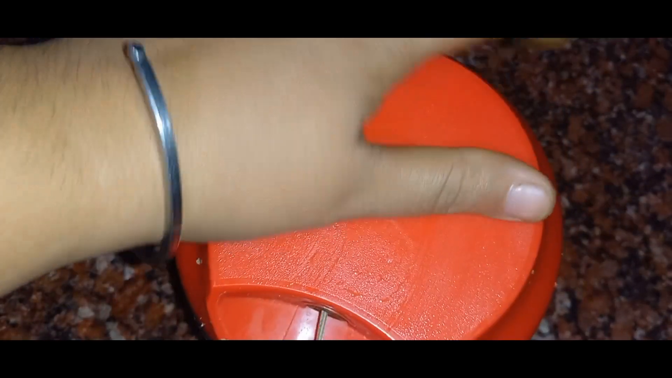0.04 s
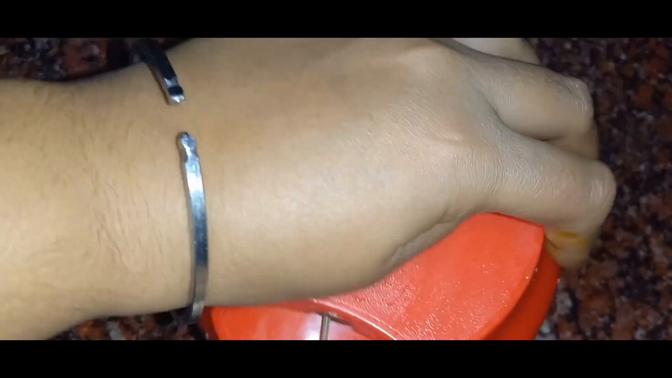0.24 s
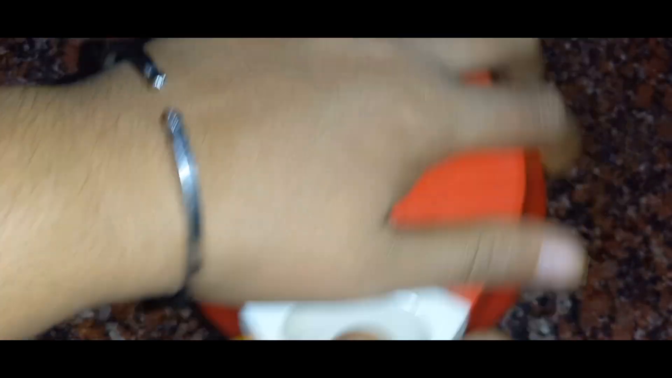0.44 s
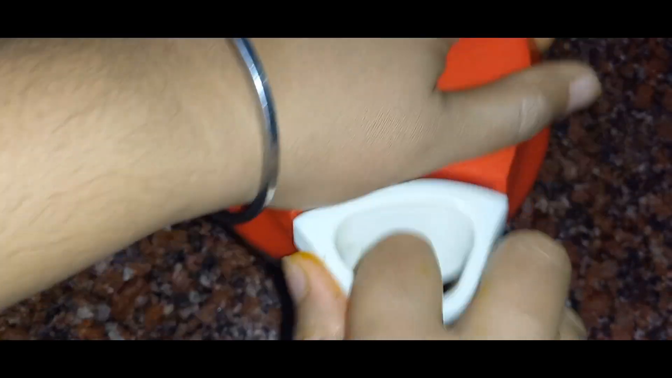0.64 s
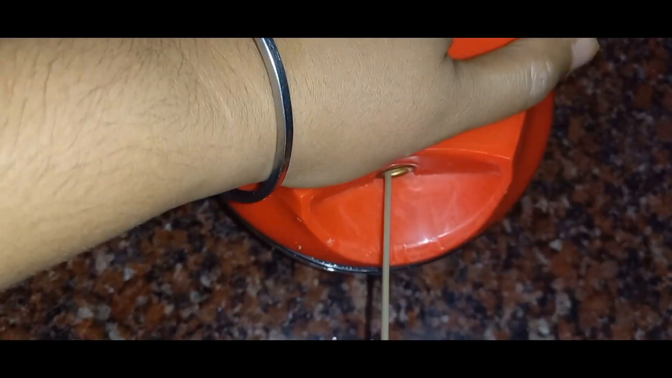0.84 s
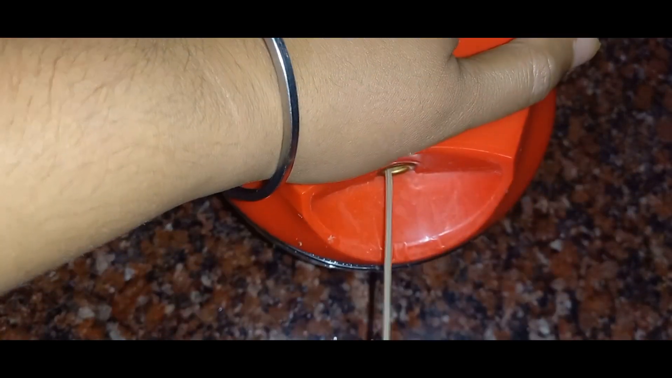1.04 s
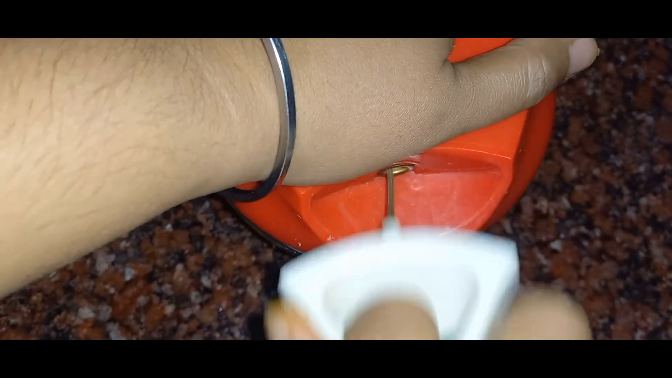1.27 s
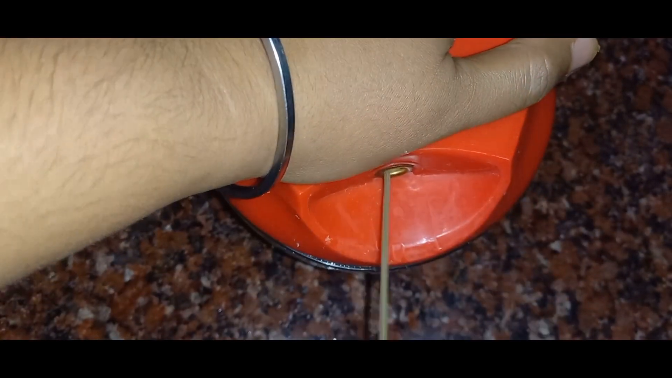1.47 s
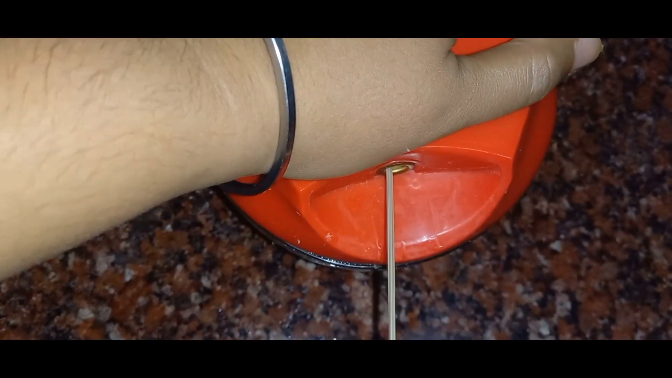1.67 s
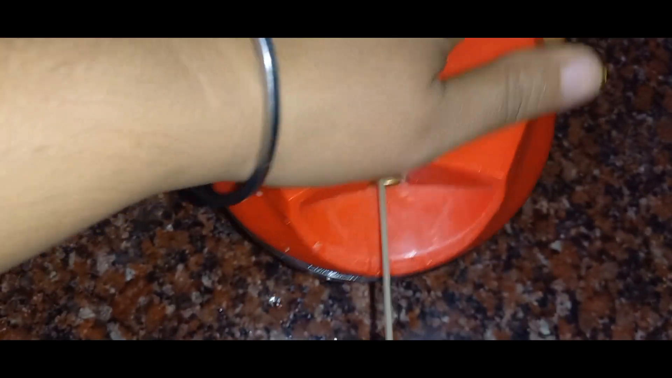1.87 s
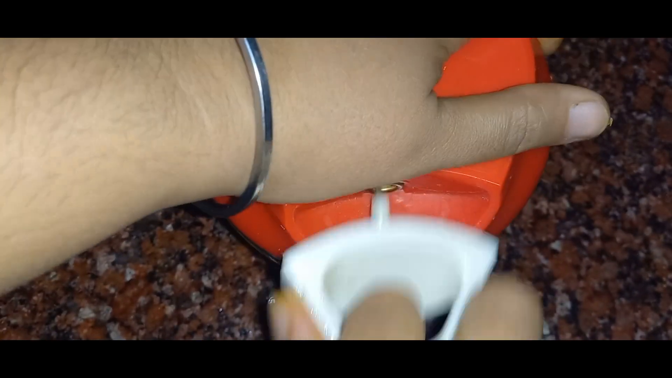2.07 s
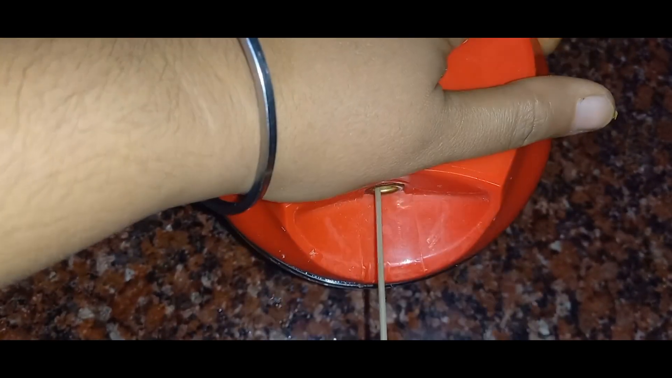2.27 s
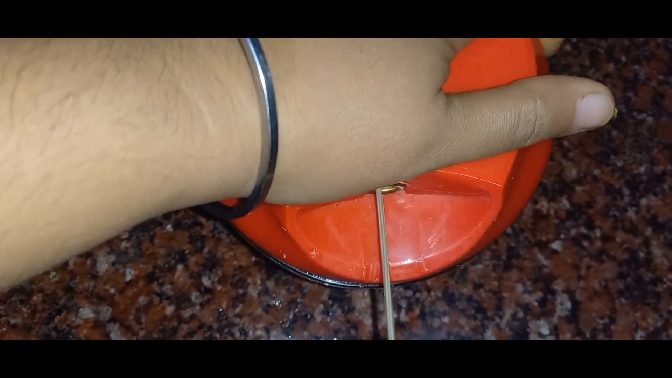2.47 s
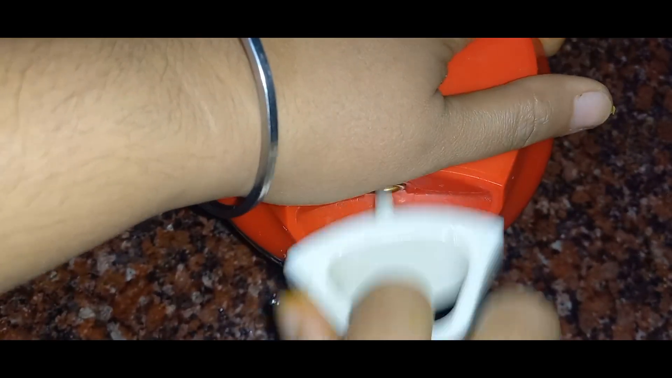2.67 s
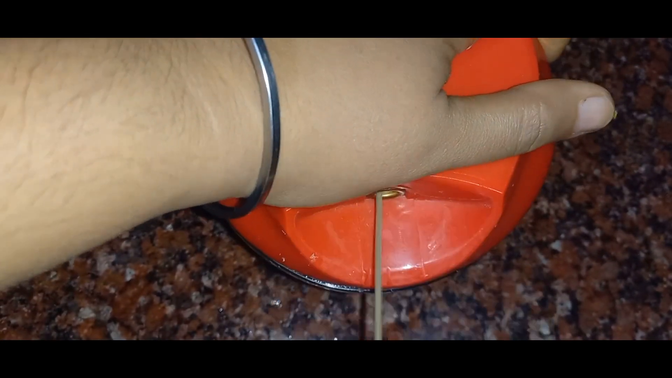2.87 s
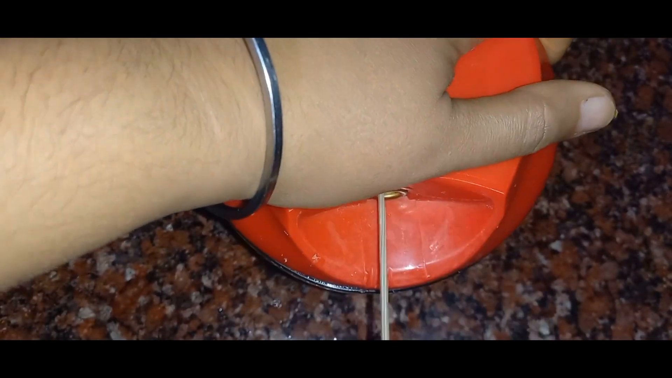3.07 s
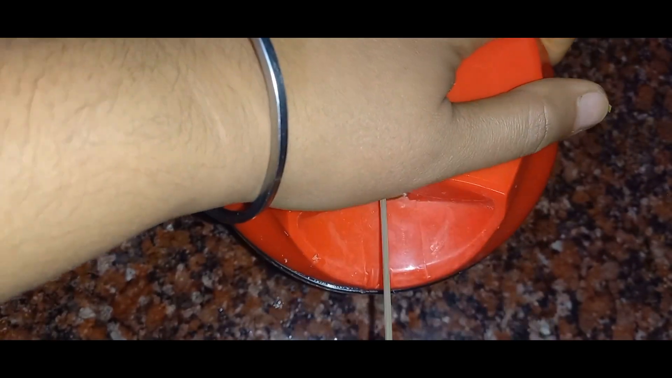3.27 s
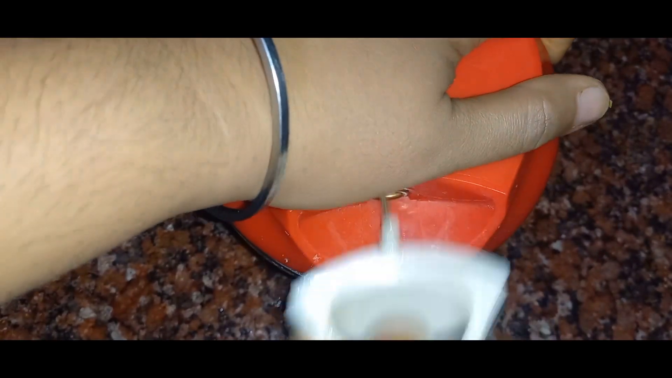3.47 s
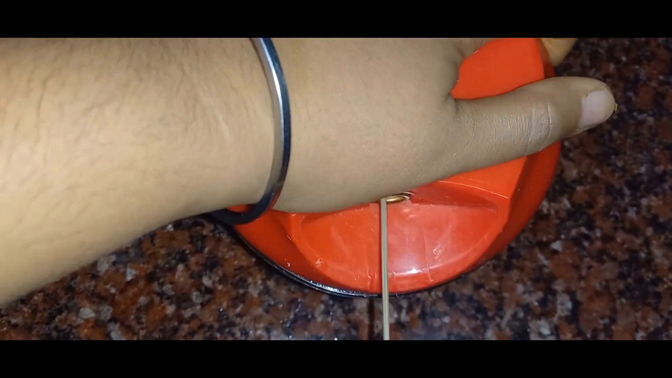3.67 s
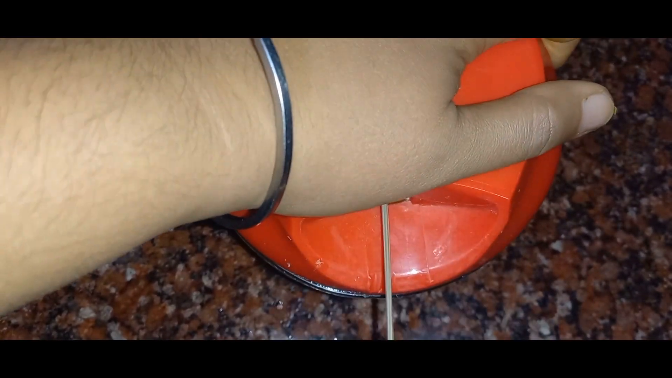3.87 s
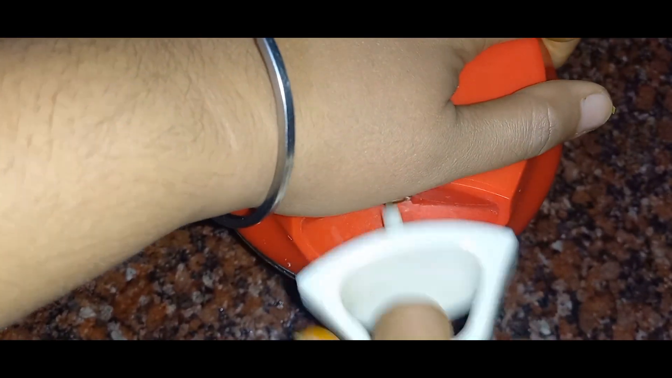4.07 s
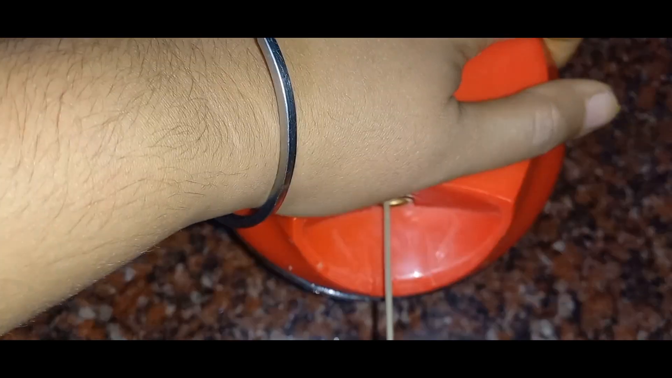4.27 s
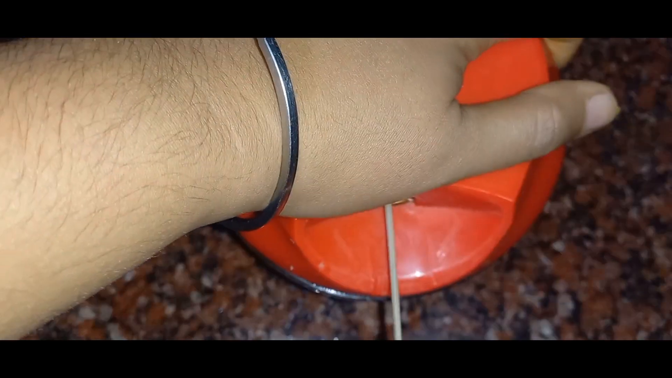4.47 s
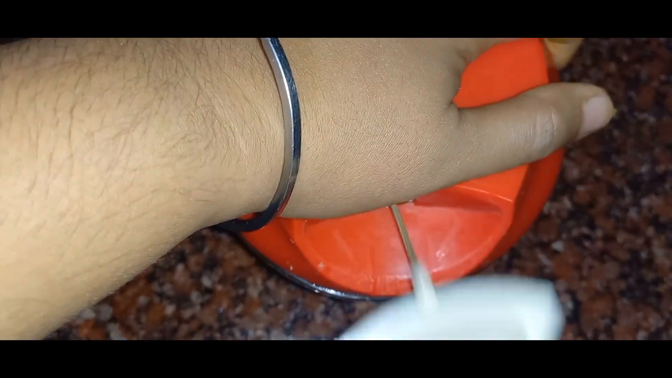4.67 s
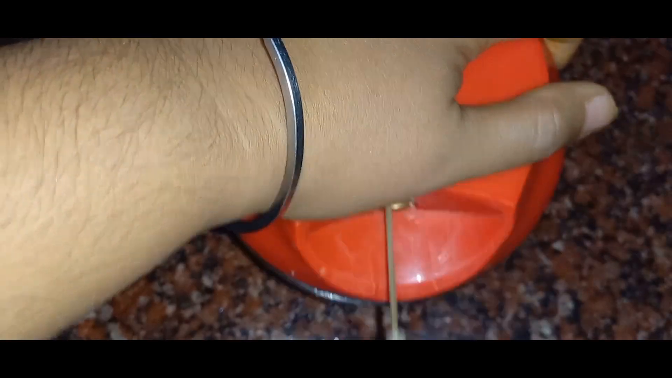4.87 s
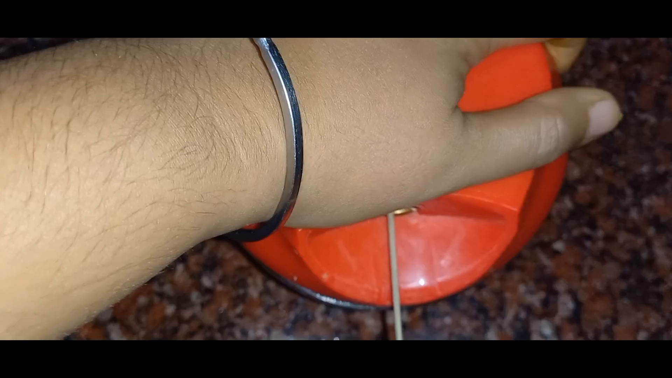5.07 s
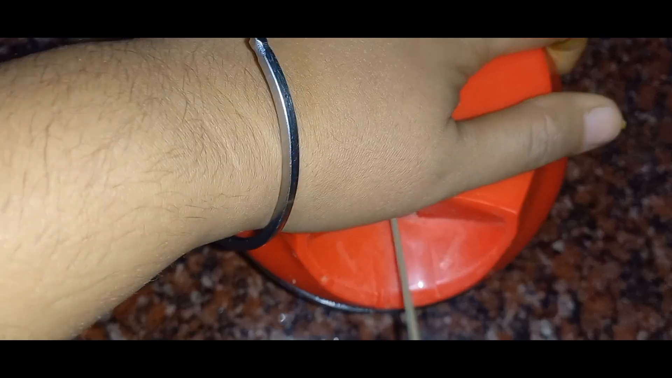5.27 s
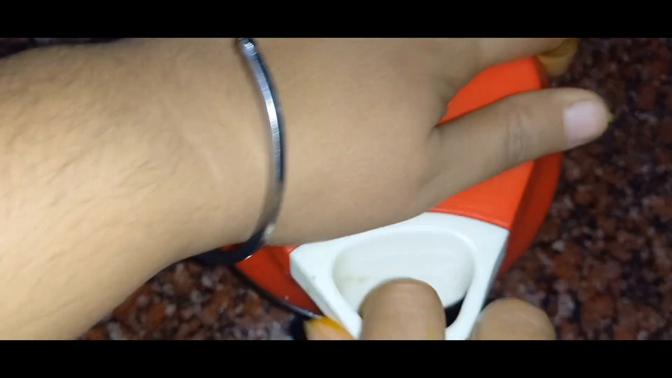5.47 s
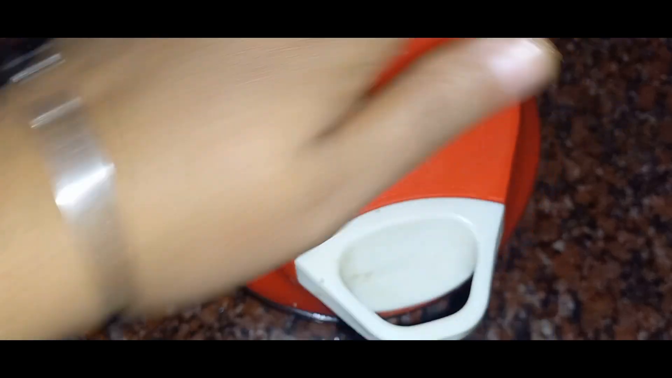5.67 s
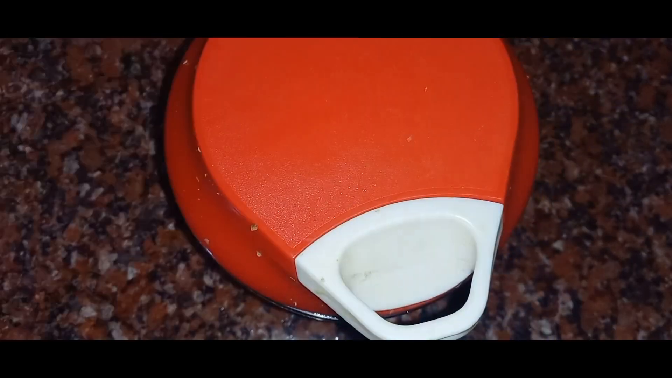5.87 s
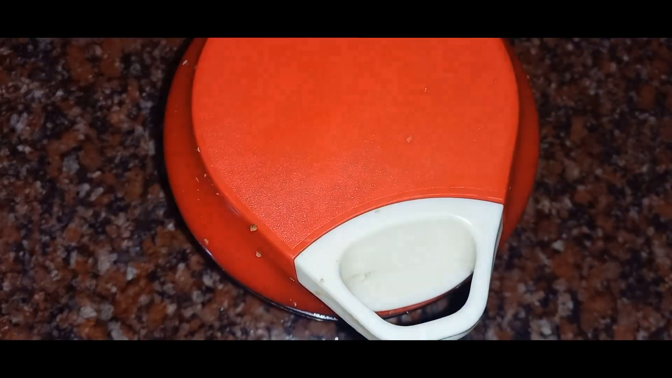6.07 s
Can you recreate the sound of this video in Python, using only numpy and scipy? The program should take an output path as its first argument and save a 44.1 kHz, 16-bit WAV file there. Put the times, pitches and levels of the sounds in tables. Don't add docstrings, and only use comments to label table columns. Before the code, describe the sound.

A hand-pull food chopper is worked in seven quick pulls, blades crunching vegetables in a plastic bowl, the cord rasping back with hard plastic clacks.

```python
import sys
import numpy as np
from scipy import signal
from scipy.fft import rfft, irfft, next_fast_len
from scipy.io import wavfile
from scipy.ndimage import uniform_filter1d

SR = 44100
rng = np.random.default_rng(int(sys.argv[2]) if len(sys.argv) > 2 else 0)


def natural_amplitude(level_db):
    exponent = np.asarray(level_db, float) / 20
    return 10 ** exponent


def file_out(sig):
    cols = np.atleast_2d(sig).T
    lim = np.clip(cols, -1, 1)
    pcm = np.round(lim * 32767).astype(np.int16)
    wavfile.write(sys.argv[1], SR, pcm)


N = 270814
TAPS = 8192
TIME = np.arange(N) / SR
HZ = np.arange(1, TAPS + 2) * SR / (2 * TAPS + 2)

# centre_hz, width_hz, height_db
BOWL_PEAKS = [(198.4, 6.9, 6.5), (227, 16, 11), (351.4, 53, 8), (451.4, 35, 7), (632, 67, 9.5),
              (1410, 170, 6), (1620, 27, 12), (1880, 420, 11), (3450, 170, 10.5), (4070, 460, 3),
              (6820, 2200, -6.5)]
# centre_hz, width_hz, height_db
SPRING_PEAKS = [(350, 45, 5.5), (662, 56, 9), (1920, 380, 15), (3300, 400, 3.5), (6400, 2430, -7.5),
                (13000, 5700, 1.5), (11360, 710, 2.5)]
# frequency_hz, level_db
BOWL_COLOUR = [(24, -58.5), (40, -30.5), (276, 5), (337, 3.5), (491, -3), (1900, -20), (2700, -16),
               (3470, -18.5), (7170, -25.5), (14800, -34.5), (16000, -44)]


def blades():
    # start_s, swell_s, hold_s, fall_s, effort_db
    pulls = [
        (0.796, 0.076, 0.17, 0.16, -26.5),
        (1.518, 0.061, 0.16, 0.11, -27),
        (2.212, 0.071, 0.17, 0.11, -26),
        (2.893, 0.11, 0.12, 0.11, -23.5),
        (3.584, 0.11, 0.12, 0.1, -23),
        (4.253, 0.11, 0.095, 0.15, -24),
        (4.914, 0.099, 0.1, 0.13, -26.5),
    ]
    # offset_db, slope_db_per_db
    pull_layers = [(-1, 0.7), (-1, 0.9), (-12, 1)]
    # pitch_hz, t60_s, level_db
    slab_modes = [(68.9, 1, -2.5), (106, 0.03, 1)]
    slab_db = [-19, -16.5, -26.5, -24.5, -20, -23, -22.5]
    cuts = grit(rate=200., scatter_db=4., tail_ms=1.1, bed_db=-14., flicker_db=1.2, flicker_rate=35., own=.35)
    crunch = wander(cuts + teeth(), BOWL_PEAKS)
    rumble = rng.standard_normal((2, N))
    slab = sum(natural_amplitude(db) * ring(hz, t60) for hz, t60, db in slab_modes)
    tables = arc(pulls, pull_layers, start_db=-11.5, end_db=-27, swell_db_per_s=-51.5)
    tables = add_layer(tables, 2, slab_db)
    tables = coast(tables, coast_s=0.058, change_db=10.5)
    return strokes(tables, [crunch] * 3 + [rumble], body(BOWL_COLOUR, BOWL_PEAKS) + [slab])


def teeth():
    rate, jitter = 110., .35
    level_db, scatter_db = 15., 5.
    timing, size, place = rng.standard_normal((int(N / SR * rate), 3)).T
    at = (np.arange(len(timing)) + jitter * timing) * SR / rate
    at = at.astype(int).clip(0, N - 1)
    out = np.zeros((2, N))
    out[:, at] = natural_amplitude(level_db + scatter_db * size) * np.array([np.ones(len(at)), place])
    return out


def spring():
    # start_s, swell_s, hold_s, fall_s, effort_db
    rewinds = [
        (1.168, 0.024, 0.11, 0.12, -34),
        (1.855, 0.06, 0.071, 0.16, -31.5),
        (2.548, 0.04, 0.044, 0.24, -32),
        (3.236, 0.052, 0.075, 0.15, -32.5),
        (3.917, 0.061, 0.064, 0.19, -31.5),
        (4.577, 0.046, 0.11, 0.12, -32),
        (5.246, 0.033, 0.085, 0.24, -38.5),
    ]
    # offset_db, slope_db_per_db
    rewind_layers = [(5.4, 1.49), (3.6, 1.1), (2.54, 1.51)]
    coil_db = [-3, -2.5, -5, -1, -2, -6, 0]
    # frequency_hz, level_db
    rasp_colour = [(24, -56), (40, -15.5), (85, -9.5), (320, -5.5), (382, -5.5), (663, -16), (1150, -23.5),
                   (1900, -23.5), (5720, -19), (11300, -25.5), (16000, -33)]
    slips = grit(rate=300., scatter_db=3., tail_ms=2.5, bed_db=-8., flicker_db=1.6, flicker_rate=45., own=.7)
    rasp = wander(slips, SPRING_PEAKS)
    seated_s = 5.58
    song = slips * natural_amplitude(4. * walk(rate=70.) - 2) * (TIME < seated_s)
    coil = ring(8370, t60=.0055)
    tables = arc(rewinds, rewind_layers, start_db=-0.89, end_db=-17, swell_db_per_s=-120)
    tables = add_layer(tables, 3, coil_db)
    tables = coast(tables, coast_s=0.13, change_db=-10)
    return strokes(tables, [rasp] * 3 + [song], body(rasp_colour, SPRING_PEAKS) + [coil])


def knocks():
    # start_s, crack_peak_db, boom_db and tick_db against the crack, pitch_hz
    lid = [(0.186, -53, -4, -7, 2250), (0.228, -47, -21, -8, 1920), (0.293, -49.5, -8.5, 3.5, 1590),
           (0.352, -21, -1, -18.5, 1920), (0.372, -21.5, -26, -6.5, 1770),
           (0.392, -20.5, -5.5, -15.5, 1960), (0.404, -23.5, -2, -3, 2000), (0.439, -30, 1.5, -5.5, 1590),
           (0.456, -30, -20, -13, 1630), (0.47, -22, -14, -30, 1560), (5.735, -33.5, 9, -18, 1910)]
    handle = [(1.434, -52, 18, -29, 1250), (1.474, -33.5, 1, -2.5, 3580), (1.484, -23, 1, -13, 1920),
              (2.123, -20.5, 2, -38, 1370), (2.781, -18, -4.5, -34.5, 1590), (2.792, -26, -9, 1.5, 2670),
              (3.517, -20.5, -7, -22, 1620), (4.195, -21, -10, -26, 1540), (4.826, -11.5, -16, -24, 2240),
              (4.836, -6, -16, -19, 2720), (5.5367, -20.5, -13, -6.5, 2800), (5.544, -15, -10, -18, 1260)]
    clutch = [(0.761, -24, -28, -5.5, 1800), (0.778, -21, -1, -11.5, 1460), (1.191, -23, -4, -3, 1460),
              (1.238, -26.5, 0, 7, 1850), (1.509, -18.5, -10, -9, 1860), (1.539, -17.5, -9, -16, 2920),
              (1.863, -29.5, -1, -6, 1930), (1.924, -16, -11, -21, 1920), (1.957, -19, -27, -11.5, 1900),
              (2.18, -24, -9, -8, 1890), (2.195, -25.5, 3.5, -30.5, 1920), (2.588, -13.5, -16, -13.5, 1410),
              (2.875, -15.5, -7.5, -16.5, 1620), (2.885, -24, -5.5, -14.5, 1980),
              (2.924, -22.5, -6, -9.5, 1790), (3.3, -14.5, -9.5, -16.5, 1630), (3.563, -26, -4, -6, 1730),
              (4.238, -23, -7.5, -5.5, 1730), (4.257, -26, 2.5, -3.5, 1810), (4.64, -13, -5, -11, 1560),
              (4.901, -27, -7, -3, 1640), (4.916, -17, -5, -16, 1620), (5.244, -20.5, -7.5, -7.5, 1410)]
    cuts = [(0.885, -16.5, -9.5, -16.5, 1670), (1.028, -12.5, -2.5, -28, 1550),
            (1.058, -14.5, -12, -25.5, 1680), (1.096, -17, -12, -13, 1900), (1.707, -18, -22, -19, 1850),
            (2.271, -15, -4.5, -31.5, 1300), (2.284, -10, -14, -17.5, 3300), (2.304, -13, -18, -27.5, 3340),
            (2.436, -27, -2.5, 8, 1480), (2.462, -18.5, -1.5, -13, 2350), (2.996, -19, -9, -10.5, 1620),
            (3.106, -16.5, -21, -8.5, 1600), (3.664, -17.5, -7.5, -20.5, 1990), (3.732, -9, -13, -25, 1850),
            (3.855, -15.5, -16, -24, 4000), (4.333, -22, 0, -11.5, 3520), (4.362, -15, -30.5, -8.5, 4270),
            (4.424, -19, -3, -11, 1640), (5.042, -28.5, 14, -13.5, 1360), (5.062, -15.5, -19, -6.5, 2340),
            (5.104, -15.5, -21, -20, 1600), (5.146, -19.5, 4, -16, 3800)]
    strays = [(0.264, -58, -18, 7, 2080), (0.49, -46, 7, -28, 1550), (1.59, -20.5, -19, -9, 1540),
              (1.645, -27, 2, -10.5, 1910), (2.505, -25, -33, -9, 3530), (2.632, -19, -13, 0.5, 1840),
              (3.063, -20, 3.5, -27, 1880), (3.138, -13.5, -13, -17, 3450), (3.151, -16, -2, -19.5, 3420),
              (3.342, -23.5, -0.5, 2, 2750), (3.491, -43, -1, 4, 1895), (3.801, -13.5, -14, -23, 3700),
              (4.248, -21.5, 2, -14, 1860), (4.47, -14.5, -18, -15, 1390), (4.677, -18.5, -9, -1.5, 3520),
              (5.283, -36, 1, -16, 1910), (5.359, -26.5, 1.5, -17, 3100)]
    bits = [(0.8455, -18, -8, -25, 1660), (0.9195, -21.5, -26, -14, 1510), (0.952, -15, -25, -11, 1770),
            (0.9882, -16.5, -7, -18, 1780), (1.1754, -31, -17, -20, 3610), (1.5808, -17, -24, -14, 3590),
            (1.614, -15.5, -23, -23, 1960), (1.67, -19.5, -14, -17, 1820),
            (1.7216, -17.5, -20, -16.5, 1420), (1.756, -27, -6, -21, 3430), (1.765, -19, -38, -32, 1230),
            (1.8174, -32, 2, -20, 1870), (1.9765, -22, -23, -19.5, 1880), (2.0004, -24, -21, -20.5, 2100),
            (2.2476, -21, -6, -39.5, 1440), (2.3586, -16.5, -22.5, -11.5, 1950),
            (2.3994, -42.5, -27, -27, 1930), (3.0517, -14, -11, -17, 1110), (3.0851, -15, -6, -20, 1600),
            (3.6792, -12, -20.5, -17, 3270), (3.714, -13.5, -3.5, -24.5, 1630),
            (3.75, -17.5, -16.5, -26.5, 1830), (3.762, -14.5, -17, -24, 4090),
            (3.8609, -23.5, -17, -9.5, 2170), (3.9734, -31, -22, -20, 1870),
            (3.9869, -14.5, -6, -28.5, 1770), (4.0255, -17, -19, -20, 1960), (4.291, -24.5, -18, -7, 1850),
            (4.3102, -25.5, -16, -11.5, 1610), (4.357, -15.5, -11, -15.5, 3940),
            (4.4167, -22.5, -22, -11.5, 1670), (4.4485, -15, -11, -23, 1600), (4.585, -26, -19, -22, 2190),
            (4.807, -37, -14, -19, 2104), (4.9965, -35, -24, -18, 1870), (5.0158, -24, -15, -3.5, 1670),
            (5.3066, -23.5, 0.5, -19, 1860)]
    snaps = [
        (3.867, -25, -29, -24, 4180),
        (5.5692, -17.5, -29, -20, 1940),
        (5.5756, -15, -38, -13.5, 1850),
        (5.5788, -17, -29, -22, 2420),
    ]
    clacks = [(0.876, -11, -15, -13, 1670), (1.002, -15, -16, -19.5, 1760),
              (1.9176, -13.5, -15.5, -18.5, 1910), (2.159, -18.5, -25.5, -34, 2170),
              (2.376, -14, -12, -18, 1900), (2.39, -17, -17, -22, 3400), (2.7986, -8, -16.5, -19.5, 2730),
              (2.808, -12.5, -11.5, -19, 2700), (3.5382, -14.5, -14.5, -23, 2630),
              (3.2402, -35, -9, -8, 3300), (3.645, -21, -15, -18, 3400), (3.919, -36, -18, 2, 3300),
              (4.5814, -29, -11, -3, 3300), (5.006, -19, -17, -17, 3300), (5.292, -26, -5, -7, 3130),
              (2.554, -38, -15, 0, 3300), (3.791, -17.5, -21, -23.5, 3310), (4.21, -9.5, -24, -24, 2530),
              (4.468, -16, -21, -8, 1710), (5.098, -9.5, -11, -18.5, 1620)]
    # rattle_ms, share of the spot's own ring, share of rattle in the crack
    contacts = [
        (10.8, 2.2, 0.43),
        (10.4, 0.87, 0.16),
        (11.3, 1.15, 0.42),
        (9.2, 2, 0.41),
        (7.7, 1.1, 0.7),
        (6.1, 0.76, 0.45),
        (4.5, 4.4, 0.33),
        (3.3, 1.8, 0.29),
    ]
    size = 3000
    out, t = np.zeros((2, N + size)), TIME[:size]
    boom, middle, treble = (response[:size] for response in body(BOWL_COLOUR, BOWL_PEAKS))
    boom = boom + .45 * ring(352., t60=.1, size=size)
    for table, kind in zip((lid, handle, clutch, cuts, strays, bits, snaps, clacks), contacts):
        rattle_ms, spot_share, loose = kind
        decay = np.exp(-t * 1000 / rattle_ms)
        for start_s, crack_db, boom_db, tick_db, pitch_hz in table:
            rattle = rng.standard_normal((2, size)) * decay
            spot = ring(pitch_hz, t60=.006, size=size)
            crack = np.exp(-t / .00005) + loose * rattle
            blow = np.exp(-t / 0.000055) + 0.19 * rattle
            parts = [
                (boom_db + 0.5, through(blow, boom)),
                (0, through(crack, middle + spot_share * spot)),
                (tick_db + 5.5, through(rattle * decay, treble)),
            ]
            at = int(start_s * SR)
            for db, part in parts:
                out[:, at:at + size] += natural_amplitude(crack_db + db) * part / np.abs(part[0]).max()
    return out[:, :N]


def thuds():
    # start_s, peak_db, pitch_hz
    lumps = [(0.816, -21, 273), (0.84, -23, 350), (0.876, -21, 342), (0.929, -19, 252), (0.966, -16.5, 275),
             (1.026, -28, 340), (1.159, -27, 343), (1.21, -20, 345), (1.433, -30, 332), (1.484, -28, 359),
             (1.531, -39, 345), (1.553, -17.5, 220), (1.581, -17.5, 343), (1.631, -14.5, 332),
             (1.707, -12.5, 338), (1.738, -12, 320), (1.924, -20.5, 303), (1.984, -31, 344),
             (2.018, -22.5, 330), (2.122, -31, 328), (2.195, -29, 330), (2.268, -12, 360),
             (2.271, -17.5, 321), (2.303, -10.5, 251), (2.456, -41, 358), (2.565, -24, 300),
             (2.592, -24.5, 404), (2.78, -32.5, 344), (2.803, -19.5, 328), (2.878, -27, 307),
             (2.898, -26, 246), (2.974, -31.5, 213), (3.251, -20.5, 347), (3.342, -27.5, 316),
             (3.516, -33, 325), (3.587, -30.5, 204), (3.587, -23, 344), (3.632, -24, 350),
             (3.67, -25.5, 318), (3.694, -11, 330), (3.852, -30, 317), (3.939, -32, 342), (3.975, -21, 329),
             (4.193, -30, 320), (4.25, -16, 336), (4.292, -14.5, 332), (4.42, -15, 350), (4.471, -13, 291),
             (4.511, -16, 346), (4.631, -17, 315), (4.834, -20.5, 338), (4.918, -27, 328), (5.043, -9, 300),
             (5.069, -12, 340), (5.106, -23, 282), (5.146, -28, 356), (5.281, -31, 345),
             (5.543, -26.5, 347)]
    size, push_ms, t60_s, level_db = 6000, 2.2, 0.11, -7
    out, t = np.zeros(N + size), TIME[:size]
    shape = (1 - np.exp(-t * 1000 / push_ms)) * np.exp(-np.log(1000) * t / t60_s)
    shape = shape / shape.max()
    for start_s, peak_db, pitch_hz in lumps:
        at = int(start_s * SR)
        out[at:at + size] += natural_amplitude(peak_db + level_db) * np.sin(2 * np.pi * pitch_hz * t) * shape
    return out[:N]


def hand():
    # start_s, swell_s, hold_s, fall_s, effort_db
    rubs = [
        (.05, .035, 0.024, .05, -60),
        (.215, 0.045, 0.2, .02, -56.5),
        (.478, 0.006, 0.01, 0.12, -53.5),
        (.715, 0.037, .005, .01, -58),
        (5.585, 0.005, 0.01, 0.13, -46),
        (5.69, 0.027, .005, .01, -57),
        (5.79, 0.0088, 0.058, 0.14, -66.5),
    ]
    # offset_db, slope_db_per_db
    rub_layers = [(-7, 0.35), (-7, 0.68), (-3, 2.4), (-4, 1.3)]
    # start_s, swell_s, hold_s, fall_s, effort_db
    drags = [
        (0., 0.0029, 0.013, 0.1, -48),
        (5.98, 0.11, 0.035, 0.068, -68.5),
    ]
    # offset_db, slope_db_per_db
    drag_layers = [(-3.5, 0.56), (-15, 1.01), (-45, 1.1), (-45, 1.01)]
    # frequency_hz, level_db
    rub_colour = [(88, -28), (150, 4.5), (341, 3), (960, -10.5), (1120, -30.5), (1240, -0.5), (1900, -14),
                  (2870, -7), (3620, -11.5), (16000, -32)]
    ends = dict(start_db=-9, end_db=-24, swell_db_per_s=-40)
    tables = arc(rubs, rub_layers, **ends) + arc(drags, drag_layers, **ends)
    friction = natural_amplitude(0.36 * walk(rate=36.0)) * rng.standard_normal((2, N))
    lid_mode = ring(2000, t60=0.0044)
    return strokes(tables, [friction] * 4, body(rub_colour, SPRING_PEAKS[:3]) + [lid_mode])


def ping():
    start_s, peak_db, low_hz, high_hz, t60_s = .372, -15, 1825, 1935, 0.08
    t = (TIME - start_s).clip(0)
    low = np.sin(2 * np.pi * low_hz * t)
    high = np.sin(2 * np.pi * high_hz * t + 1 - np.exp(-t * 1e4))
    envelope = (1 - np.exp(-t / .0012)) * np.exp(-np.log(1000) * t / t60_s)
    ports = np.array([[1], [.5]])
    return natural_amplitude(peak_db) * (low + .7 * high) / 1.1 * envelope * ports


def thump():
    # pitch_hz, level_db, t60_s
    thump_modes = [(70, -14.5, 0.64), (118, -16, .4), (198, 2, 0.2), (209, -10, 0.3), (229, -13, 0.55),
                   (270, -9, 0.16), (332, 1, 0.064), (345, -17, .3), (455, -3, .06), (627, -0.5, 0.04),
                   (890, -8, .03)]
    start_s, peak_db, push_ms = 5.736, -18, 2
    t = (TIME - start_s).clip(0)
    tone = 0
    for hz, db, t60 in thump_modes:
        tone = tone + natural_amplitude(db) * np.sin(2 * np.pi * hz * t) * np.exp(-np.log(1000) * t / t60)
    tone = tone * (1 - np.exp(-t * 1000 / push_ms))
    return natural_amplitude(peak_db) * tone / np.abs(tone).max()


def bump():
    start_s, level_db, pitch_hz, rise_s, t60_s = 6.04, -41, 137, .02, .3
    t = (TIME - start_s).clip(0)
    envelope = (1 - np.exp(-t / rise_s)) * np.exp(-np.log(1000) * t / t60_s)
    return natural_amplitude(level_db) * np.sin(2 * np.pi * pitch_hz * t) * envelope


def echoes(t60, start_ms):
    t = TIME[:SR // 2]
    decay = np.exp(-np.log(1000) * t / t60) * (t * 1000 >= start_ms)
    return unit(rng.standard_normal((2, len(t))) * decay) * np.sqrt(2)


def air():
    # frequency_hz, level_db
    air_colour = [(18, -84), (30, -56), (64, -34), (100, -10), (124, -18), (233, -39.5), (336, -27.5),
                  (384, -37), (1000, -46), (3400, -51), (16000, -54.5)]
    # time_s, level_db
    air_fade = [(0, -7.5), (.5, -4), (5.901, -2), (6.02, -12), (6.14, -15.5)]
    s, db = np.transpose(air_fade)
    hush = through(rng.standard_normal((2, N)), unit(causal(colour(air_colour))))
    return hush * natural_amplitude(-51 + np.interp(TIME, s, db))


def grit(rate, scatter_db, tail_ms, bed_db, flicker_db, flicker_rate, own):
    spots_hz = (220, 340, 520, 750, 1050, 1400, 1850, 2400, 3100, 4000, 5200, 6800, 8800, 11200, 14000)
    step = 8
    shape = (len(spots_hz) + 1, N // step + 1)
    sizes = natural_amplitude(2 * scatter_db * rng.exponential(size=shape).clip(0, 3 / 2))
    hits = (rng.random(shape) < rate * step / SR) * sizes
    sprays = signal.lfilter([1], [1, -np.exp(-2000 * step / (SR * tail_ms))], hits)
    sprays = sprays / sprays.mean()
    total, noise = 0, rng.standard_normal((2, N))
    for hz, spray in zip(spots_hz, sprays[1:]):
        scraping = natural_amplitude(2 * bed_db) * (1 + (hz / 1810.0) ** 2)
        power = own * spray + (1 - own) * sprays[0] + scraping
        level = np.repeat(np.sqrt(power), step)[:N]
        damping = natural_amplitude(1.6 * walk(rate=14.))
        spot = signal.butter(1, [hz / 1.12, hz * 1.12], "band", fs=SR)
        total = total + signal.lfilter(*spot, level * damping * noise)
    return unit(total * natural_amplitude(flicker_db * walk(flicker_rate))) * np.sqrt(2 * N)


def wander(force, peaks):
    pitch_share, height_share = .03, .22
    f, _, z = signal.stft(force, SR, nperseg=4096)

    def bell(hz, width):
        return 1 / (1 + (2 * (f[:, None] - hz) / width) ** 2)

    db = 0
    for hz, width, height in peaks:
        shift, change = rng.standard_normal((2, z.shape[-1]))
        moved = (1 + height_share * change) * bell(hz * (1 + pitch_share * shift), width)
        db = db + height * (moved - bell(hz, width))
    return signal.istft(z * natural_amplitude(db), SR, nperseg=4096)[1][:, :N]


def walk(rate):
    k = int(SR / rate)
    return uniform_filter1d(np.repeat(rng.standard_normal(N // k + 1), k), k // 2 + 1)[:N]


def arc(rows, layers, start_db, end_db, swell_db_per_s):
    tables = []
    for start, swell, hold, fall, db in rows:
        corners = start + np.cumsum([0, swell, hold, fall])
        effort = np.array([start_db + swell_db_per_s * swell, 0, 0, end_db])
        levels = [db + offset + slope * effort for offset, slope in layers]
        tables.append(list(np.transpose([corners] + levels)))
    return tables


def add_layer(tables, column, offsets_db):
    return [[(*row, row[column] + db) for row in table] for table, db in zip(tables, offsets_db)]


def coast(tables, coast_s, change_db):
    return [table + [np.array(table[-1]) + (coast_s, *[change_db] * (len(table[-1]) - 1))] for table in tables]


def strokes(tables, forces, responses):
    gains = np.zeros((len(responses), N))
    for table in tables:
        s, *levels = np.transpose(table)
        on = (TIME >= s[0]) & (TIME < s[-1])
        gains[:, on] += [natural_amplitude(np.interp(TIME[on], s, db)) for db in levels]
    gains = uniform_filter1d(gains, size=130)
    return sum(through(g * f, r) for g, f, r in zip(gains, forces, responses))


def body(points, peaks):
    db = colour(points) + sum(g / (1 + (2 * (HZ - f) / w) ** 2) for f, w, g in peaks)

    def loss_above(edge_hz):
        return 10 * np.log10(1 + (HZ / edge_hz) ** 8)

    def loss_below(edge_hz):
        return loss_above(edge_hz) - 80 * np.log10(HZ / edge_hz)

    losses = loss_above(800), loss_below(800) + loss_above(5500), loss_below(5500)
    return [unit(causal(db - loss)) for loss in losses]


def ring(hz, t60, size=3 * TAPS):
    t = TIME[:size]
    return unit(np.sin(2 * np.pi * hz * t) * np.exp(-np.log(1000) * t / t60))


def unit(x):
    return x / np.sqrt(np.sum(x ** 2))


def colour(points):
    hz, db = np.transpose(points)
    return np.interp(np.log(HZ), np.log(hz), db)


def causal(db):
    c = irfft(db * np.log(10) / 20)
    c[1:TAPS] *= 2
    c[TAPS + 1:] = 0
    return irfft(np.exp(rfft(c)))[:TAPS]


def through(x, response):
    size = next_fast_len(x.shape[1] + response.shape[-1])
    return irfft(rfft(x, size) * rfft(response, size), size)[:, :x.shape[1]]


def scene():
    # frequency_hz, level_db
    port_colour = [(60, -45.5), (110, -9.5), (200, -17), (380, -8.5), (700, -7), (1290, -3.5), (2380, -4),
                   (4400, -1), (8120, 0.5), (15000, -1)]
    chopper = blades() + spring() + knocks() + thuds() + hand() + ping() + thump() + bump()
    dull = signal.lfilter([.4], [1, -.6], chopper)
    both = chopper + natural_amplitude(-12.5) * through(dull, echoes(t60=.32, start_ms=3.)) + air()
    mid, side = both[0], through(both[1:], causal(colour(port_colour)))[0]
    lead, lead_hz = 1.1, 2600
    side = side + lead * signal.filtfilt(*signal.butter(2, lead_hz, fs=SR), np.gradient(mid))
    return np.array([mid + side, mid - side])


def top_cut(x):
    return signal.sosfilt(signal.butter(12, 16640, fs=SR, output="sos"), x)


def record(dry):
    low_cut = signal.ellip(4, .5, 20.5, 64.5, "high", fs=SR, output="sos")
    high_cut = signal.ellip(7, .2, 27, 15600, fs=SR, output="sos")
    mix = signal.sosfilt(high_cut, signal.sosfilt(low_cut, dry))
    return top_cut(mix)


dry = scene()
out = record(dry)
file_out(out)
```